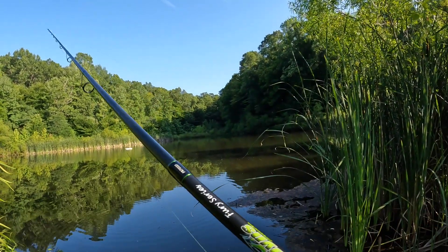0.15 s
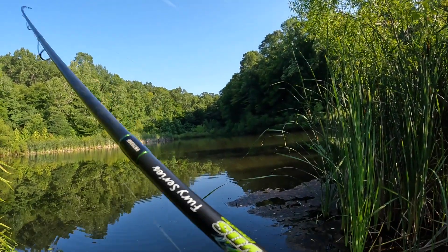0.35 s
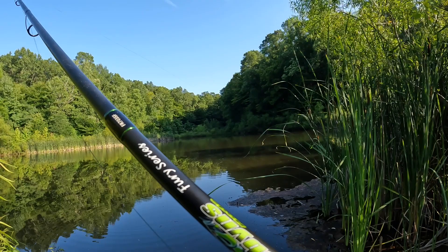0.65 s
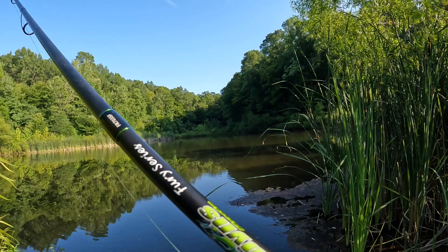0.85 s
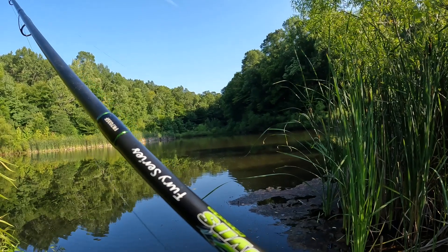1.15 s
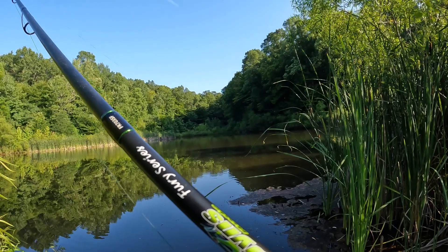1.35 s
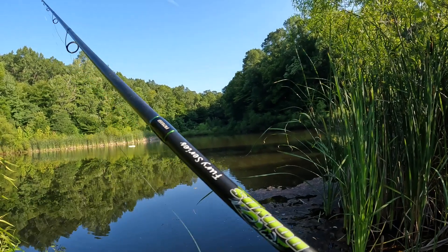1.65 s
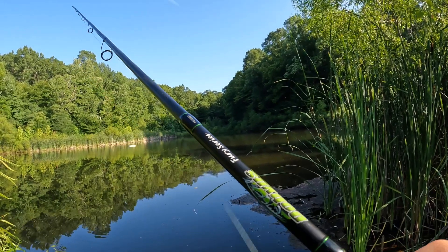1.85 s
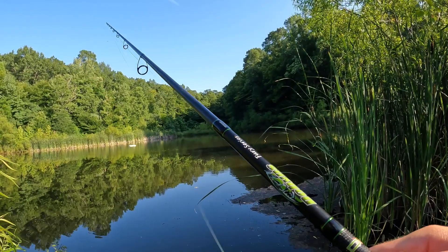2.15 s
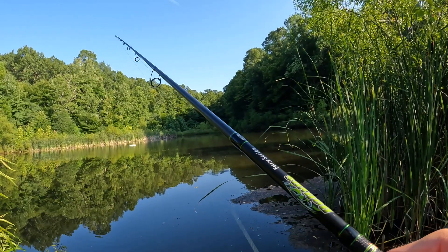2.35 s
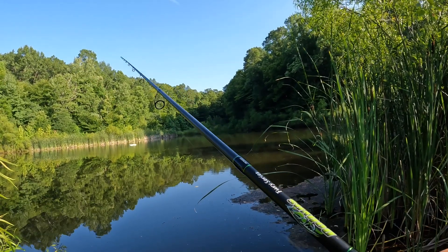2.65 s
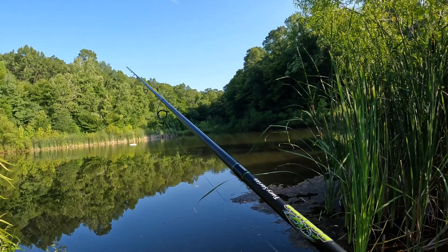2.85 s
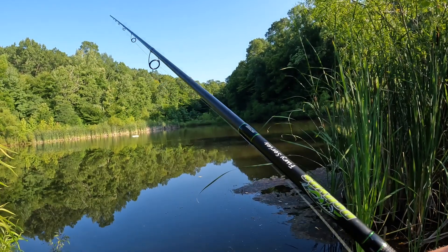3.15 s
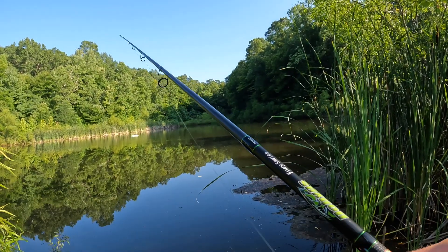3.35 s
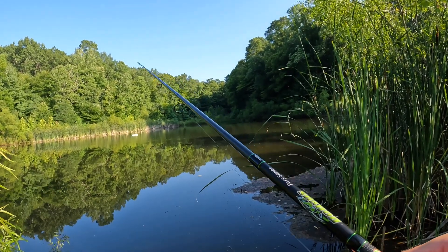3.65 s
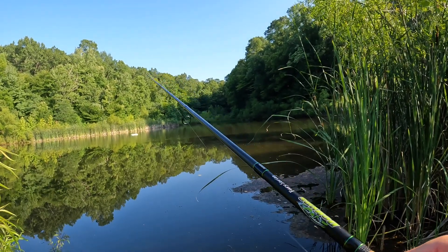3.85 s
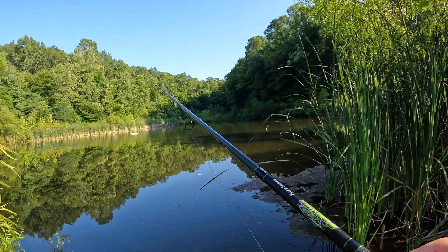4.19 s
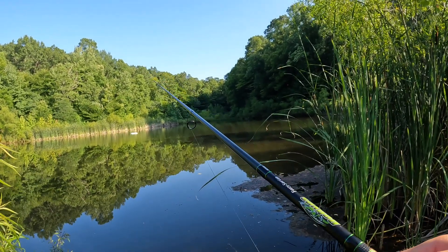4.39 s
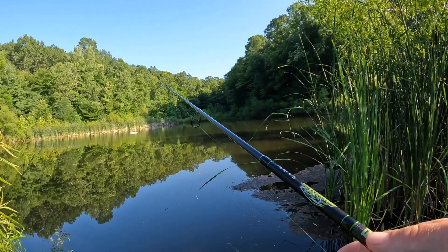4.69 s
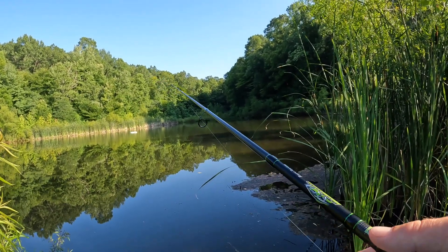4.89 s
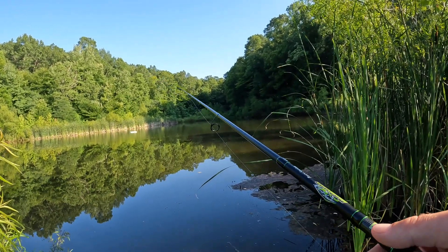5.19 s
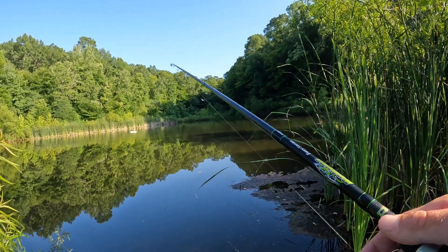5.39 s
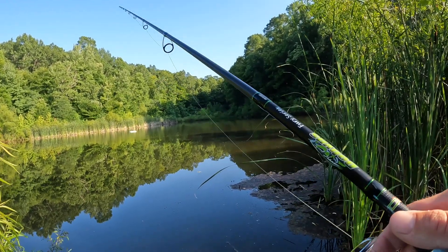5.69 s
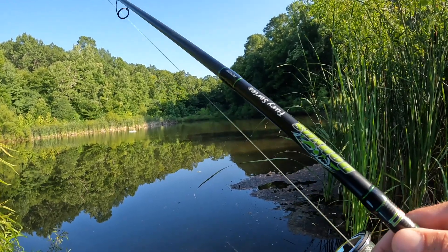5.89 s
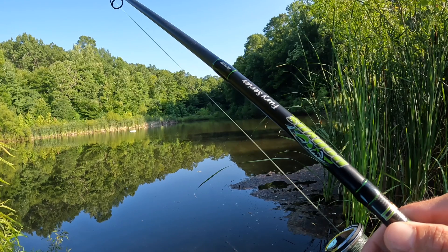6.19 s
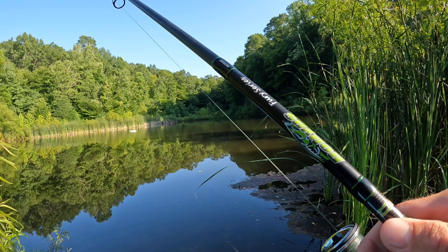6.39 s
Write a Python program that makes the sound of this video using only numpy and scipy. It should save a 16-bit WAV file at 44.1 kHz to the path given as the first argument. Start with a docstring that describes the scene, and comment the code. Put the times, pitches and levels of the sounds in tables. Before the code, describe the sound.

Short scrapes, clicks and soft knocks from a fishing reel, with high crickets and low, far traffic behind.

```python
"""Crickets trill at a summer woodland pond, over a far insect chorus, traffic and humming engines.
Each trill is a train of wing strokes, short falling tones that the trees scatter.
Up close a fishing rod is worked: friction rings the reel, its pawl ticks, the line swishes and
whirrs, cloth rustles. Body movement thumps the camera, and soft knocks ring its case.
Later come one sharp jolt, one rising bubble and a far peep."""
import sys
import numpy as np
from scipy import signal
from scipy.fft import rfft, irfft, next_fast_len
from scipy.io import wavfile
from scipy.ndimage import uniform_filter1d, map_coordinates

SR = 44100
rng = np.random.default_rng(int(sys.argv[2]) if len(sys.argv) > 2 else 0)


def store_pcm(level_fs):
    """Save levels as 16-bit WAV."""
    pcm = np.round(np.clip(level_fs, -1, 1) * 32767).astype(np.int16)
    wavfile.write(sys.argv[1], SR, np.atleast_2d(pcm).T)


N = 287973
T = np.arange(N) / SR

# spells of winding the reel: start_s, level_db, rise_s, hold_s, fall_s
WINDING_SPELLS = [(0, -79.5, 0.13, 0.076, 4.6), (2.25, -73.5, 0.52, 1.44, 0.86),
                  (4.71, -75, 0.3, 0.017, 0.17)]
# treble sheen of sliding line and cloth: freq_hz, level_db
SHEEN_SPECTRUM = [(8400, -8.5), (9200, -13.5), (10000, -5.5), (11500, -8.5), (13000, -14.5), (14200, -19.5)]


def amp(db):
    return 10 ** (np.asarray(db) / 20)


def unit(x):
    return x / np.sqrt(np.mean(x ** 2) + 1e-20)


def along(points, hz):
    """Read a (freq_hz, value) curve on a log frequency axis."""
    freqs, values = np.transpose(points)
    return np.interp(np.log(hz + 1), np.log(freqs + 1), values)


def away(start, rise, hold, fall):
    """0 while a sound holds, growing by 1 per rise time before and per fall time after."""
    return np.maximum(np.maximum((start - T) / rise, (T - start - hold) / fall), 0)


def swells(rows):
    """Summed fades: each climbs 20 dB per rise up to its start, holds, then drops 20 dB per fall."""
    return sum(amp(db - 20 * away(start, rise, hold, fall)) for start, db, rise, hold, fall in rows)


def wobble(rate):
    """A smooth random curve, rate knots a second."""
    return map_coordinates(rng.standard_normal(int(N * rate / SR) + 4), [T * rate])


def tone(hz):
    """A sine of rms 1 that follows a pitch curve."""
    return np.sqrt(2) * np.sin(2 * np.pi * np.cumsum(hz) / SR)


def filtered(x, response):
    """Filter x by a complex response of frequency."""
    size = next_fast_len(N + SR // 2)
    return irfft(rfft(x, size) * response(np.fft.rfftfreq(size, 1 / SR)), size)[..., :N]


def rush(spectrum, patchy_db):
    """Coloured stereo noise of rms 1 that flickers in patches of time and frequency."""
    # stereo likeness: freq_hz, correlation
    likeness = [(40, 0.85), (130, 1), (300, 0.38), (1000, 0.49), (3000, 0.75), (5500, 1), (7500, 0.51)]
    bins = signal.stft(rng.standard_normal((2, N)), nperseg=512)[2]
    patches = uniform_filter1d(rng.standard_normal(bins.shape[1:]), size=6, axis=0)
    patches = uniform_filter1d(patches, size=12, axis=1)
    pair = signal.istft(bins * amp(patchy_db * unit(patches)), nperseg=512)[1][:, :N]
    width = lambda f: np.arccos(np.clip(along(likeness, f), -1, 1)) / 2
    mid, side = filtered(pair, lambda f: amp(along(spectrum, f)) * [np.cos(width(f)), np.sin(width(f))])
    return unit(np.array([mid + side, mid - side]))


def ring(modes, spread_db, attack_s):
    """One blow on (pitch_hz, level_db, t60_s) modes, each at a random strength."""
    t = T[:SR // 8]
    partials = sum(amp(db + spread_db * rng.normal() - 60 * t / t60) * np.sin(2 * np.pi * hz * t)
                   for hz, db, t60 in modes)
    return (1 - np.exp(-t / attack_s)) * partials


def trill(hz, waver_hz, pulse_hz, duty, fall_hz):
    """Wing strokes: a wavering tone slides down as the wings close, once a pulse."""
    cycle = (np.cumsum(pulse_hz * (1 + .003 * wobble(3))) / SR + rng.random()) % 1
    closing = np.clip(cycle / duty, 0, 1)
    pitch = hz + fall_hz * (.5 - closing) + waver_hz * wobble(70)
    return unit(np.sin(np.pi * closing) * amp(0.4 * wobble(30)) * tone(pitch))


def steady_crickets():
    """Five crickets trill throughout, each from its own side."""
    # singers: pitch_hz, waver_hz, pulse_hz, duty_share, level_db, left_over_right_db
    singers = [(6854, 15, 34.95, 0.69, -69.5, 5.5), (7127, 18.15, 21, 0.96, -75, -12),
               (6970, 30, 51, 0.86, -80, 1), (7900, 79, 24, 0.52, -79.5, 3), (5780, 80, 23, 0.55, -80, -2)]
    song = 0
    for hz, waver_hz, pulse_hz, duty, db, pan_db in singers:
        gain = amp(db + 0.74 * wobble(1.47)) * amp([[pan_db / 2], [-pan_db / 2]])
        song += gain * trill(hz, waver_hz, pulse_hz, duty, fall_hz=29.59)
    return song


def among_trees(song):
    """Trees scatter a sound into a short diffuse tail as strong as the direct path."""
    t60_s = 0.28
    tail = rng.standard_normal((2, SR // 2)) * amp(-60 * T[:SR // 2] / t60_s)
    return song + signal.fftconvolve(song, tail / np.linalg.norm(tail[0]), axes=1)[:, :N]


def far_bed():
    """Distant insects, traffic and leaves blur into a slowly growing bed of noise."""
    # massed insects: freq_hz, level_db
    chorus_spectrum = [(3000, -45.5), (3700, -51), (4600, -21.5), (5300, 1), (5600, 2.5), (5950, -5.5),
                       (6500, -3.5), (6700, -2.5), (7100, 1.5), (8150, 1), (8330, -7), (8450, -64),
                       (9500, -106)]
    # traffic and leaves: freq_hz, level_db
    traffic_spectrum = [(12, -23), (20, -2.5), (33, -7.5), (48, -10), (78, -9), (91, -14.5), (115, -15),
                        (176, -13.5), (535, -33), (585, -33), (1420, -47.5), (1620, -52), (4500, -88.5),
                        (5850, -99), (9900, -120)]
    chorus = amp(-66) * rush(chorus_spectrum, patchy_db=1.5)
    traffic = amp(-54.5) * rush(traffic_spectrum, patchy_db=2.5)
    return amp(0.3 * T) * (chorus + traffic)


def passing_engine():
    """A far engine hums at its firing rate, louder as it nears and softer as it leaves."""
    # the pass: nearest_s, half_power_after_s, level_db, firing_hz
    engine_pass = (2, 0.47, -54, 69.5)
    nearest, width, db, hz = engine_pass
    distance = np.hypot(1, (T - nearest) / width)
    return amp(db + 2.6 * wobble(7)) / distance * tone(hz + 1.13 * wobble(7))


def reel():
    """Gritty friction rings the reel's resonances, softly as it turns and hard when it is jerked."""
    # reel resonances: centre_hz, width_hz, level_db
    modes = [(365, 30, -4), (918, 35, 0), (1020, 35, -1), (1300, 35, -2), (1480, 45, -2), (1870, 50, -4),
             (2100, 60, -7), (2585, 50, -2), (3090, 40, -12), (3430, 37, 1), (3570, 30, 0), (3885, 35, -12),
             (5200, 70, -8)]
    # rubbing noise: freq_hz, level_db
    scrape_spectrum = [(410, -28), (700, -20.5), (846, -3), (1150, 5), (2010, -3), (2950, -7.5),
                       (5000, -10.5), (6500, -16.5), (11000, -120)]
    # bursts of friction: start_s, level_db, t60_s, centre_hz, spread_octaves
    jerks = [(0.397, -14.5, 0.076, 1440, 1.59), (0.404, -7.5, 0.034, 3620, 0.16),
             (0.418, -21.5, 0.22, 826, 1.3), (0.429, -15.5, 0.37, 390, 0.52),
             (0.466, -32, 0.081, 1400, 0.93), (.63, -44, 0.082, 3270, 0.46),
             (2.231, -39.5, 0.83, 1970, 0.53), (3.05, -28, 1, 400, 0.56), (3.42, -35.5, 0.36, 2070, 0.37),
             (3.71, -39, 0.2, 3450, 0.072), (3.895, -43, 0.066, 3480, .1), (5.512, -35, 0.31, 2220, 0.47),
             (5.61, -42, 0.15, 1990, 0.51), (5.84, -22.5, 0.23, 1210, 1), (5.879, -34.5, 0.31, 1170, 1)]
    body = lambda f: sum((-1) ** k * amp(db) * 1j * f * width / (hz * hz - f * f + 1j * f * width)
                         for k, (hz, width, db) in enumerate(modes))
    grit = rng.standard_normal(N) * amp(1.2 * wobble(200))
    grit = grit + 0.19 * rng.standard_normal((2, N))  # left and right hear different sides of the reel
    rub_db = 20 * np.log10(swells(WINDING_SPELLS) + amp(-78.5))  # a faint rub remains at rest
    ring_db = 1.3 * (rub_db + 70) - 7  # the firmer the rub, the more of it rings
    ringing = amp(ring_db) * unit(filtered(grit, lambda f: body(f) * (f > 800)))
    out = amp(rub_db) * (ringing + amp(0.5) * rush(scrape_spectrum, patchy_db=2.5))
    surface = lambda f: body(f) + amp(-15.5)  # bare friction fills in between the resonances
    hiss = lambda f: amp(-36) * (f > 700) / (1 + (f / 9000) ** 4)
    for start, db, t60, centre_hz, spread in jerks:
        t = np.clip(T - start, 0, None)
        burst = grit * amp(-60 * t / t60) * (1 - np.exp(-t / (.05 * t60)))
        band = lambda f: amp(-6 * (np.log2(f / centre_hz + 0.0011) / spread) ** 2)
        out += amp(db) * filtered(burst, lambda f: surface(f) * (band(f) + hiss(f)))
    return out


def body_sway():
    """Body movement swings the camera mount: a sub rumble with about two thumps a second."""
    # thumps: middle_s, level_db
    thumps = [(.45, -41), (1.03, -45), (1.6, -41), (2.15, -47), (2.681, -47.5), (2.949, -49.5),
              (3.401, -46), (4.02, -49.5), (4.53, -49), (4.771, -48.5), (5.071, -47), (5.652, -40.5),
              (6.3, -42.5)]
    mount_hz, width_s = 18.5, 0.04
    out = amp(-60) * rush([(8, -53.5), (16, 4.5), (32, -2.5), (60, -7), (120, -62.5)], patchy_db=1.5)
    for middle, db in thumps:
        t = T - middle
        swing = np.cos(2 * np.pi * (mount_hz * (1 + .1 * rng.normal()) * t + rng.random()))
        out += amp(db) * np.sqrt(2) * np.exp(-.5 * (t / width_s) ** 2) * swing
    return out


def rustle():
    """Cloth and line rustle in brief swells of treble noise."""
    # rustles: start_s, level_db, rise_s, hold_s, fall_s
    rustles = [(.1, -81.5, 0.23, .02, .2), (.42, -75, 0.061, 0.036, 0.21), (.66, -81, .04, 0.016, 0.054),
               (4.75, -75, 0.32, 0.042, 0.067), (4.94, -72, 0.22, .02, 0.025), (5.12, -77, .09, .01, 0.11),
               (5.55, -75.5, 0.19, 0.017, 0.22), (5.86, -69, .05, 0.0091, .15)]
    return swells(rustles) * rush(SHEEN_SPECTRUM, patchy_db=2)


def line_swish():
    """Line runs through the rod rings: a noise band, highest and loudest at full speed."""
    # swishes: fastest_s, level_db, rise_s, fall_s, centre_hz
    swishes = [(0.111, -59, 0.043, 0.11, 6000), (5.531, -58, .06, .07, 6260)]
    out = 0
    for fastest, db, rise, fall, hz in swishes:
        slowing = away(fastest, rise, 0, fall)
        band = unit(filtered(rng.standard_normal((2, N)), lambda f: 1 / (1 + (f / 800) ** 2)))
        centre_hz = hz * np.clip(1 - .33 * slowing, .3, 1)
        out += amp(db - 20 * slowing ** 1.9) * band * tone(centre_hz)
    return out


def case_knocks():
    """Soft contacts ring the camera case, each on another spot and so with other overtones."""
    # contacts: start_s, level_db, hardness_db_per_octave
    contacts = [(0.101, -41.5, 0.5), (0.159, -45.5, -4), (0.488, -44.5, -3), (0.528, -42.5, 1.5),
                (1.007, -44, -9.5), (1.015, -39.5, 1), (1.585, -41.5, 2.5), (2.7, -43, 4),
                (4.599, -43, -11.5), (6.327, -45, 0)]
    # case resonances: pitch_hz, level_db, t60_s
    case_modes = [(260, -6, .04), (365, -5, .05), (440, 0, .05), (560, -4, .04), (1230, -10, .03),
                  (2080, -17, .025)]
    out = np.zeros(N + SR)
    for start, db, hardness in contacts:
        modes = [(hz * (1 + 0.071 * rng.normal()), mode_db + hardness * np.log2(hz / 440), t60)
                 for hz, mode_db, t60 in case_modes]
        out[round(start * SR):][:SR // 8] += amp(db) * ring(modes, spread_db=2.5, attack_s=.003)
    return out[:N]


def far_motor():
    """A second motor comes and goes, its wavering note sagging each time."""
    # spells of hum: start_s, hold_s, level_db, pitch_hz, sag_hz_per_s, swell_db_per_s
    hums = [(.55, .55, -66, 120, 0.5, 4.5), (4.194, .9, -62, 131, 1.5, -5),
            (5.75, .9, -61.5, 130.4, 7.5, 9.5)]
    out = 0
    for start, hold, db, hz, sag, swell in hums:
        t = T - start
        gain = swells([(start, db, .25, hold, .3)]) * amp(swell * t + 3.65 * wobble(7))
        out += gain * tone(hz - sag * t + 1.17 * wobble(7.5))
    return out


def cricket_phrase():
    """One cricket sings a single phrase that starts flat and soft, then settles."""
    # the phrase: start_s, end_s, level_db
    phrase = (.64, 3.02, -71)
    start, end, db = phrase
    unsettled = np.exp(-np.clip(T - start, 0, None) / .4)
    gain = swells([(start, db, .05, end - start, .05)]) * amp(-4 * unsettled)
    return gain * trill(5422 - 220 * unsettled, waver_hz=22, pulse_hz=41.05, duty=.55, fall_hz=260)


def reel_ticks():
    """Each tick is a bright crack, a dull puff from the housing and a short ring of the pawl."""
    # ticks: start_s, ring_db, puff_db, crack_db
    ticks = [(1.6451, -58, -52, -53), (1.8032, -69, -66, -48.5), (1.8646, -59.5, -55, -50),
             (2.69, -39, -29, -29), (2.8135, -53, -51, -40), (2.837, -50, -40, -47),
             (2.8473, -53, -51, -37), (2.885, -34, -31.5, -29.5), (2.9035, -40, -42, -35.5),
             (2.9687, -40, -41, -35.5), (2.99, -55, -58, -36.5), (3.0324, -51, -51, -56),
             (3.0668, -46.5, -46.5, -48.5), (3.3655, -37, -21.5, -54), (3.5717, -53, -51, -46),
             (3.5887, -53.5, -71, -50), (3.9205, -54, -48, -54), (4.5032, -57, -44, -43.5),
             (4.6293, -60, -46, -53), (4.7086, -59, -40, -44.5)]
    # pawl resonances: pitch_hz, level_db, t60_s
    pawl_modes = [(2330, 0, .022), (2600, -12, .015)]
    # colour of the crack: freq_hz, gain_db
    crack_eq = [(1500, -10.5), (3500, -6), (5500, 4.5), (8000, -2.5), (9000, -24), (10500, -6.5),
                (13500, -39)]
    rings, puffs, cracks = np.zeros((3, N + SR))
    t = T[:SR // 8]
    for start, ring_db, puff_db, crack_db in ticks:
        at = slice(round(start * SR), round(start * SR) + len(t))
        rings[at] += amp(ring_db) * ring(pawl_modes, spread_db=1, attack_s=.001)
        puffs[at] += amp(puff_db - 60 * t / 0.043) * rng.standard_normal(len(t))
        cracks[at] += amp(crack_db - 60 * t / .008) * rng.standard_normal(len(t))
    housing = lambda f: (1j * f * 1500 / (950 ** 2 - f * f + 1j * f * 1500)) ** 2
    bright = lambda f: amp(along(crack_eq, f))
    return rings[:N] + filtered(puffs[:N], housing) + filtered(cracks[:N], bright)


def chirping_cricket():
    """Another cricket fades in, its wing strokes bunched into about eleven chirps a second."""
    # its entry: full_voice_s, level_db, rise_s
    entry = (2.2, -74.5, .6)
    start, db, rise = entry
    chirps = np.clip(0.17 + np.sin(2 * np.pi * np.cumsum(11 + 0.65 * wobble(2.6)) / SR), 0, 1)
    strokes = trill(7400, waver_hz=60, pulse_hz=65, duty=.45, fall_hz=500)
    return swells([(start, db, rise, N / SR, 1)]) * unit(chirps * strokes)


def line_whirr():
    """The line whirrs in the treble during the second spell of winding."""
    return amp(-5.5) * swells(WINDING_SPELLS[1:2]) * rush(SHEEN_SPECTRUM, patchy_db=1.2)


def jolt():
    """A sharp jolt of the camera pushes the microphone membranes in and lets them swing back."""
    # the hit: start_s, level_db, rise_s
    hit = (3.3663, -22, 0.00098)
    start, db, rise = hit
    age = np.clip(T - start, 0, None) / rise
    push = age * np.exp(1 - age)
    rebound = 0.02 * age * np.exp(1 - age / 6)
    return amp(db) * amp([[1.2], [-1.2]]) * (rebound - push)


def bubble():
    """One bubble pops with a quick upward glide."""
    # the pop: middle_s, length_s, level from low to high pitch as first_hz, last_hz, level_db
    pop = (3.768, .05, 600, 1510, -62)
    middle, length, first_hz, last_hz, db = pop
    glide = 1 / (1 + np.exp(np.clip(-7 * (T - middle) / length, -50, 50)))
    gain = swells([(middle - .25 * length, db, .02, .6 * length, .012)])
    return gain * tone(first_hz + (last_hz - first_hz) * glide)


def far_peep():
    """One short, level whistle from far off."""
    # the note: start_s, hold_s, pitch_hz, level_db
    note = (4.735, .05, 5250, -65)
    start, hold, hz, db = note
    return swells([(start, db, .012, hold, .04)]) * tone(np.full(N, hz))


def scene():
    crickets = among_trees(steady_crickets() + cricket_phrase() + chirping_cricket())
    background = passing_engine() + far_motor() + far_bed()
    fishing = reel() + body_sway() + line_swish() + line_whirr() + rustle() + reel_ticks()
    return crickets + background + fishing + case_knocks() + jolt() + bubble() + far_peep()


def record(dry):
    """The two microphone ports differ in level and phase, and pass nothing above 14.3 kHz."""
    # level difference of the ports: freq_hz, left_over_right_db
    balance = [(60, 1), (180, -3), (530, -5.5), (1560, -0.5), (4640, -0.5), (13800, 3)]
    # phase difference of the ports: freq_hz, left_lead_rad
    phase_lead = [(0, 1.74), (780, -1.1), (1980, -0.78), (2580, -0.97), (3530, -1.8), (4820, -0.25),
                  (5430, -0.98), (6890, 1.26), (8610, -0.71), (10800, -1.1), (14000, 0.063)]
    left = lambda f: amp(along(balance, f) / 2) * np.exp(.5j * along(phase_lead, f))
    return filtered(dry, lambda f: np.array([left(f), 1 / left(f)]) * (f < 14300))


dry = scene()
out = record(dry)
store_pcm(out)
```